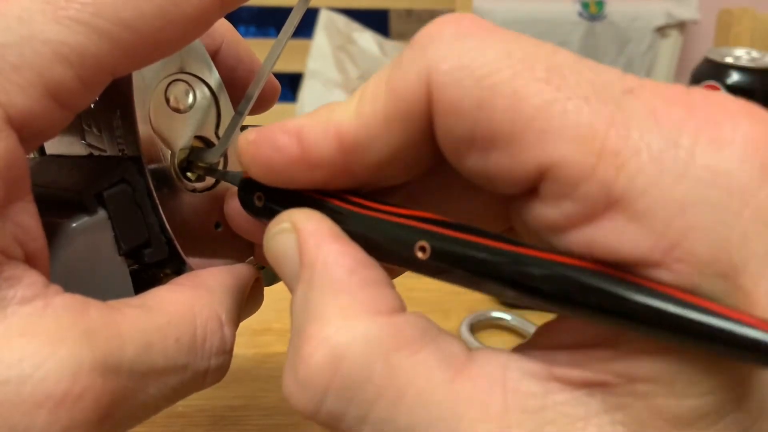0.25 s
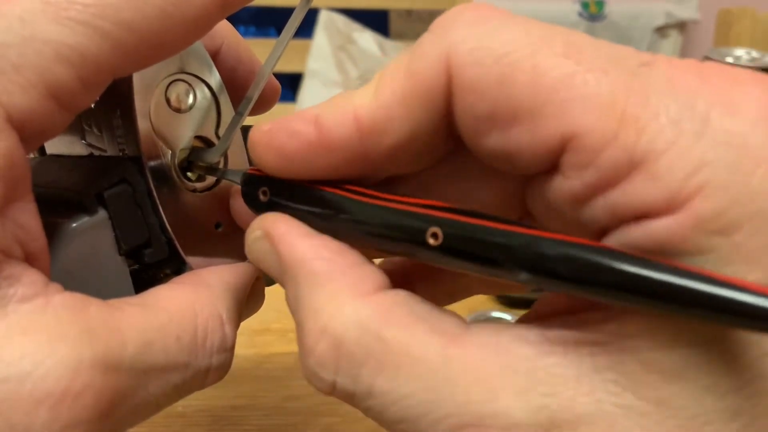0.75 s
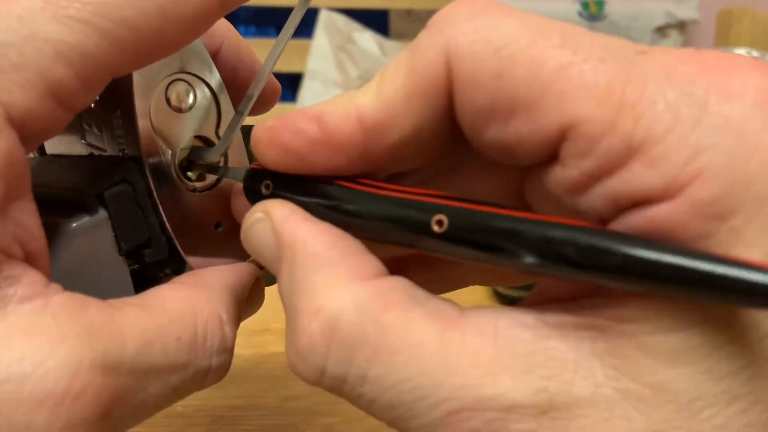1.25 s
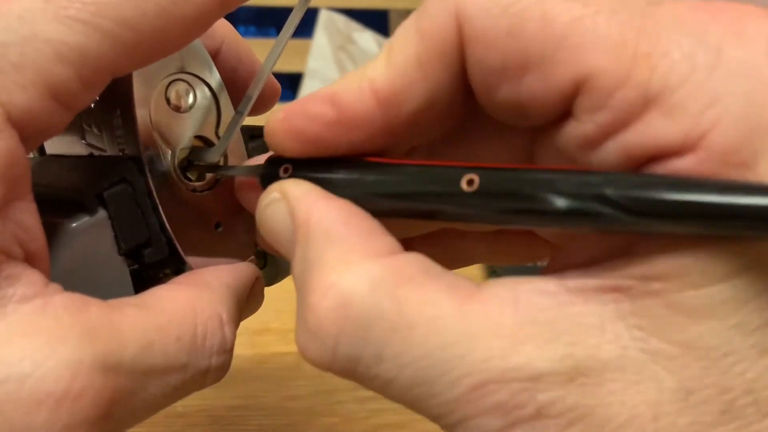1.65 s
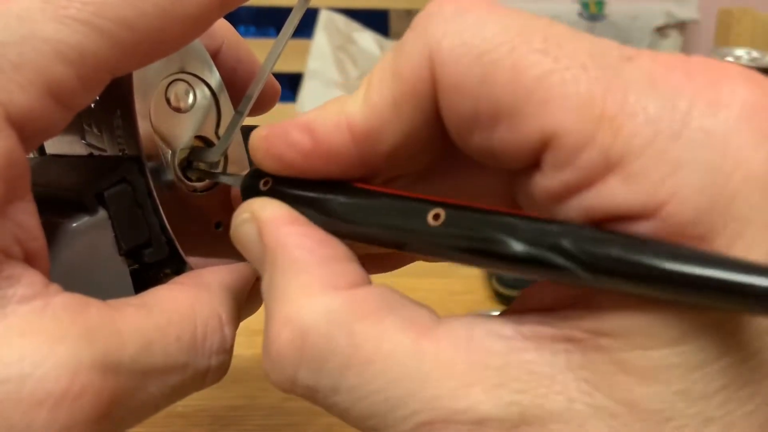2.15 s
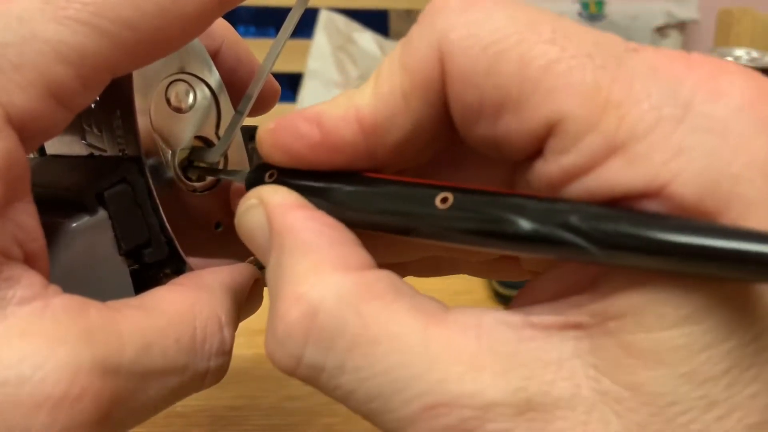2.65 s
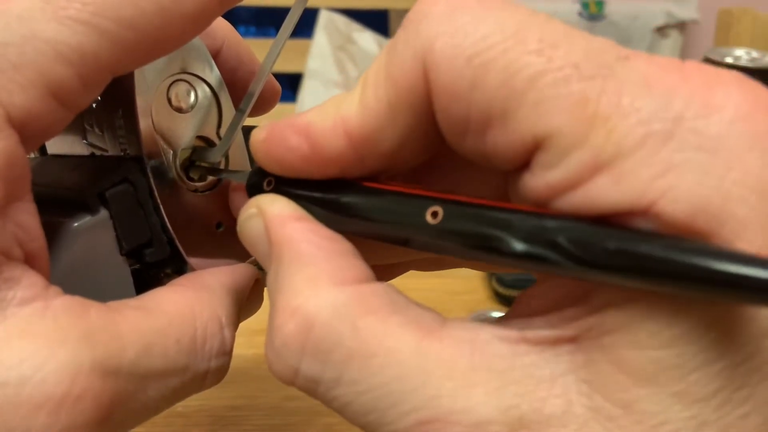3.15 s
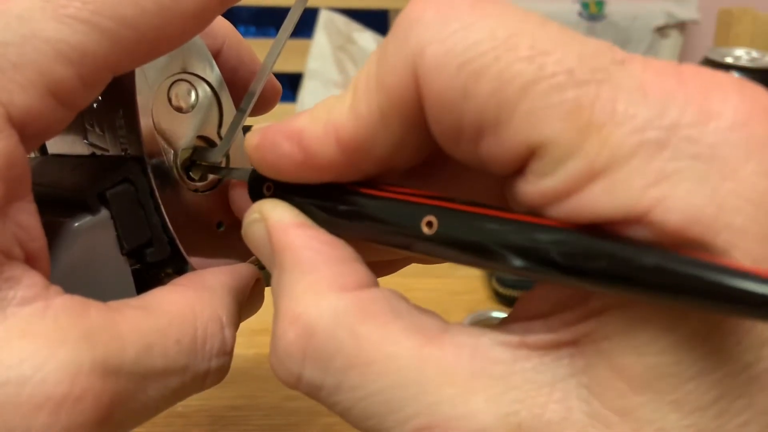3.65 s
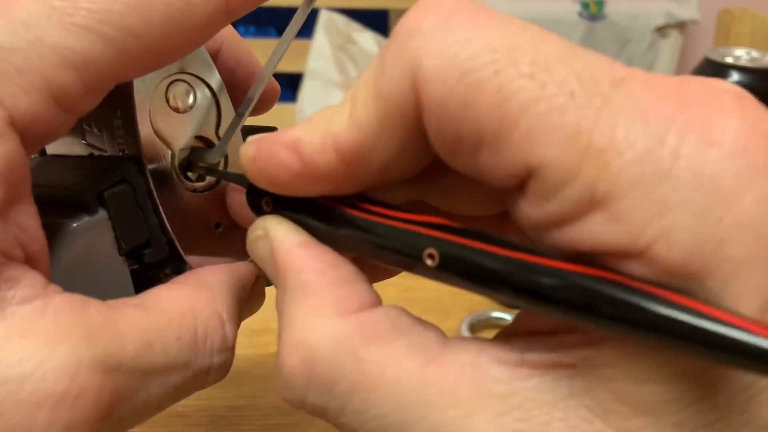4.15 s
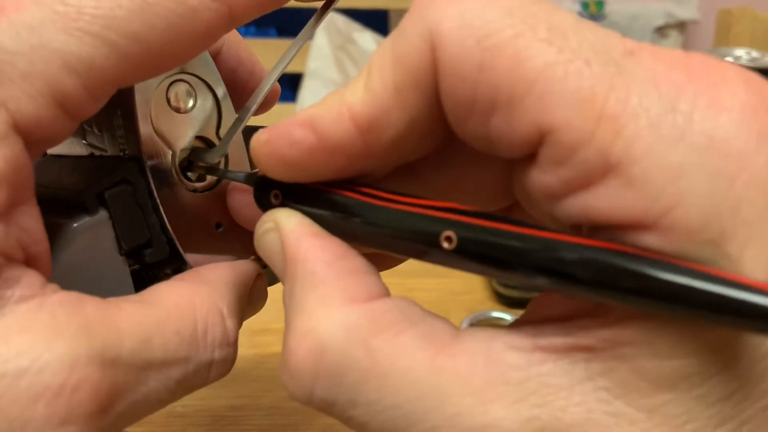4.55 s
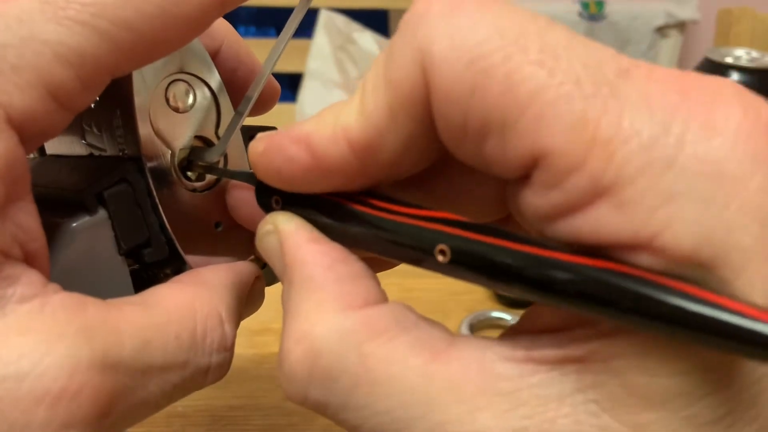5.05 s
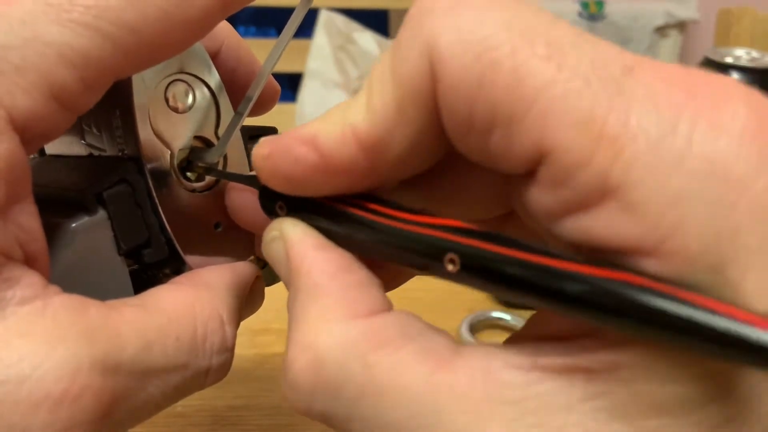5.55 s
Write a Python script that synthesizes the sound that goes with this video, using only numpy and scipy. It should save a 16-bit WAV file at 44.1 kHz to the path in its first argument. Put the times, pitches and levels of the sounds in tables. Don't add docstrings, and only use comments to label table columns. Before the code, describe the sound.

Close-up lock picking: sparse faint ticks, a brief scratchy cluster, a few hard steel snaps and a final chirp above quiet room rumble.

```python
import sys
import numpy as np
from scipy import signal
from scipy.fft import rfft, irfft, next_fast_len
from scipy.io import wavfile
from scipy.ndimage import uniform_filter1d

SR = 44100
rng = np.random.default_rng(int(sys.argv[2]) if len(sys.argv) > 2 else 0)


def field_ratio(decibels):
    return 10 ** (np.asarray(decibels, dtype=float) / 20)


def master_out(mix):
    frames = np.transpose(np.atleast_2d(mix))
    ceiling = np.clip(frames, -1, 1)
    pcm = np.round(ceiling * 32767).astype(np.int16)
    wavfile.write(sys.argv[1], SR, pcm)


N = 256220


def unit(x):
    return x / np.sqrt(np.mean(x ** 2) + 1e-20)


def along(points, hz):
    f, v = np.transpose(points)
    return np.interp(np.log(hz + 1), np.log(f + 1), v)


def filtered(x, response):
    m = next_fast_len(x.shape[-1] + 8192)
    spectrum = rfft(x, m) * response(np.fft.rfftfreq(m, 1 / SR))
    return irfft(spectrum, m)[..., :x.shape[-1]]


def smoothed(x, rows, columns):
    return uniform_filter1d(uniform_filter1d(x, size=rows, axis=0), size=columns, axis=1)


def ring(t, hz, db, t60, attack, phase=0):
    envelope = field_ratio(db - 60 * t / t60) * (1 - np.exp(-t / attack))
    return envelope * np.sin(2 * np.pi * (hz * t + phase))


def add(track, s, sound):
    track[round(s * SR):][:len(sound)] += sound


def struck(events, rise_s):
    out, t = np.zeros(N + SR), np.arange(SR // 5) / SR
    for s, hz, db, t60 in events:
        add(out, s, ring(t, hz, db, t60, rise_s(hz)))
    return out[:N]


# f/Hz, correlation
LIKENESS = [(40, .92), (170, .96), (340, .85), (450, .25), (1000, .3), (1600, .55), (3000, .35),
            (6000, .35), (7200, .99)]
# f/Hz, level/dB
BALANCE = [(30, -1), (60, 2.5), (150, -4), (300, 0), (650, 4.5), (1100, 0), (4000, 0), (5500, -2.5),
           (7500, 0.5)]


def diffuse(pair):
    turn = lambda hz: np.arccos(np.clip(along(LIKENESS, hz), 0, 1)) / 2
    mid, side = filtered(pair, lambda hz: np.array([np.cos(turn(hz)), np.sin(turn(hz))]))
    return filtered(np.array([mid + side, mid - side]), lambda hz: field_ratio(along(BALANCE, hz) * [[.5], [-.5]]))


# f/Hz, width/Hz, level/dB
DUCT_MODES = [(56.67, 19, 9), (99.57, 6.6, 11.5), (144.65, 12, 11), (184.6, 5.3, 9.5), (213.4, 12, 7.5),
              (240, 30, 5.5), (305, 12, 3), (342.8, 8, 6), (558, 15, 7.5), (614, 22, 7.5),
              (688.4, 11.97, 11.5), (733, 33, 7), (801, 13, 6.5), (2014, 72.5, 12), (2350, 60, 0.5),
              (3415, 18, 10.5)]


def rush(spectrum, patchy_db):
    z = signal.stft(rng.standard_normal((2, N)), nperseg=2048)[2]
    patches = unit(smoothed(rng.standard_normal(z.shape[1:]), 3, 4))
    pair = signal.istft(z * field_ratio(patchy_db * patches), nperseg=2048)[1][:, :N]
    duct_db = lambda hz: sum(db / (1 + (2 * (hz - c) / w) ** 2) for c, w, db in DUCT_MODES)
    return unit(filtered(diffuse(pair), lambda hz: field_ratio(along(spectrum, hz) + duct_db(hz))))


# f/Hz, level/dB
RUMBLE = [(18, -56.5), (30, -19.5), (91, -13), (183, 0), (272, -10.5), (347, -5), (437, -18.5),
          (480, -20.5), (620, -52.5), (1060, -120)]
# f/Hz, level/dB
VENT_AIR = [(350, -42), (480, -2.5), (700, -2), (900, -3.5), (1300, -14), (1700, -4.5), (2000, -18.5),
            (2350, -8), (2800, -15), (3400, -18), (3900, -28), (4400, -16.5), (4900, -47.5), (6500, -49.5)]
# f/Hz, level/dB
MIC_HISS = [(3000, -40), (5000, 4), (7000, -5.5), (12000, -6), (14500, -9.5), (16000, -27.5), (17500, -72)]
# t/s, level/dB
RUMBLE_DRIFT = [(0, -49.5), (1.9, -49.5), (2.3, -48), (3.15, -49.5), (3.5, -47.5), (3.68, -49), (4.9, -50),
                (5.2, -50.5), (5.81, -48.5)]


def hum():
    s, rumble_db = np.transpose(RUMBLE_DRIFT)
    drift = field_ratio(np.interp(np.arange(N) / SR, s, rumble_db) + 2.0)
    rumble = drift * rush(RUMBLE, patchy_db=1.5)
    air = field_ratio(-60) * rush(VENT_AIR, patchy_db=1.2)
    hiss = field_ratio(-85.0) * rush(MIC_HISS, patchy_db=3.0)
    return rumble + air + hiss


# f/Hz, t60/s
REVERB_TIME = [(300, .5), (2000, .5), (5500, .45), (9000, .45), (12000, .37), (16000, .34)]


def room(x):
    out, stretch = np.zeros((2, N + SR)), SR // 2
    for start in range(0, N, stretch):
        hz, t, z = signal.stft(diffuse(rng.standard_normal((2, stretch))), SR, nperseg=256)
        decay = field_ratio(-60 * t / along(REVERB_TIME, hz)[:, None])
        build_up = 1 - 0.35 * np.exp(-t / 0.025)
        tail = signal.istft(z * decay * build_up, SR, nperseg=256)[1]
        wet = signal.fftconvolve(x[None, start:start + stretch], tail / np.linalg.norm(tail[0]), axes=1)
        add(out.T, start / SR + .003, wet.T)
    return out[:, :N]


def gated(x):
    gate_db = -84
    z = signal.stft(x, nperseg=256)[2]
    power = np.abs(smoothed(np.mean(np.abs(z) ** 2, axis=0), 5, 5))
    gain = np.sqrt(power / (power + field_ratio(2 * gate_db)))
    return signal.istft(z * gain, nperseg=256)[1][:, :N]


# f/Hz, level/dB
WALL_RETURN = [(200, 1), (1500, 16.5), (4000, 8.5), (6000, 7), (7500, 1), (8400, 4), (9200, 2.5),
               (11000, -3), (13500, 2), (14500, 0), (15900, -6), (16600, -24)]


def echo(x):
    return gated(field_ratio(-21.0) * room(filtered(x, lambda hz: field_ratio(along(WALL_RETURN, hz)))))


# t/s, f/Hz, level/dB, t60/s
STAND_MODES = [
    (3.7125, 420, -34, .03),
    (3.7115, 1300, -43, 0.025),
    (3.712, 900, -41, .025),
    (3.7135, 640, -36, .035),
    (3.712, 230, -35, .04),
]


def stand():
    return struck(STAND_MODES, lambda hz: 0.49 / hz)


# t/s, f/Hz, level/dB, t60/s
TABLE_MODES = [
    (4.1, 210, -33, .04),
    (3.723, 110, -33, 0.053),
    (3.7115, 1630, -34.5, 0.023),
    (1.793, 1400, -48, .008),
    (3.552, 1900, -53, .008),
    (3.711, 2800, -37.5, .012),
    (3.711, 3980, -30.5, 0.0083),
    (3.711, 4700, -33, 0.0092),
    (3.552, 2700, -46.5, .01),
    (3.552, 4500, -44.5, 0.011),
]


def table():
    return struck(TABLE_MODES, lambda hz: 0.21 / hz)


# t/s, centre f/Hz, level/dB, t60/s
VICE_KNOCKS = [
    (1.7927, 900, -53, 0.031),
    (3.5538, 1500, -53, 0.017),
    (3.71, 697, -35.5, 0.02),
    (3.712, 602, -32, 0.02203),
    (4.531, 1497, -45.5, 0.026),
]


def vice():
    out, t = np.zeros(N + SR), np.arange(SR // 5) / SR
    for s, hz, db, t60 in VICE_KNOCKS:
        band = signal.butter(2, [hz / 3, hz * 2], "band", fs=SR)
        dull = signal.lfilter(*band, rng.standard_normal(len(t)))
        add(out, s, field_ratio(db - 60 * t / t60) * unit(dull))
    return out[:N]


# t/s, f/Hz, level/dB, t60/s
WRENCH_CHIRPS = [
    (5.7953, 3170, -46, 0.015),
    (5.7994, 3110, -15, 0.011),
    (5.7994, 3300, -26, 0.009),
    (5.7996, 4300, -48, .005),
    (5.8058, 3100, -24, .011),
    (5.8058, 4200, -46, .006),
]


def wrench():
    return struck(WRENCH_CHIRPS, lambda hz: 0.00074)


def rub(strokes, parts):
    t = np.arange(N) / SR
    stroke = sum(field_ratio(db) * np.sin(np.pi * np.clip((t - s) / length, 0, 1)) for s, length, db in strokes)
    grit = rng.standard_normal(N) * rng.exponential(size=N) ** 1.2
    loss = lambda f: 1j * f * 900
    steel = lambda f: sum(field_ratio(db) * loss(f) / (hz * hz - f * f + loss(f)) for hz, db, t60 in parts)
    return stroke * unit(filtered(grit, steel))


# t/s, length/s, level/dB
PICK_STROKES = [
    (0.545, 0.037, -75),
    (1.362, 0.0087, -76),
    (1.445, .03, -83),
    (1.538, 0.033, -61),
    (1.569, 0.077, -67),
    (4.02, .025, -80),
    (5.422, .045, -75.5),
    (5.748, 0.03, -70),
    (5.772, 0.017, -69),
    (5.796, .014, -68),
]


def scrapes():
    return rub(PICK_STROKES, SHANK + PIN + SPRING + TIP[:1] + BODY)


# t/s, length/s, level/dB
DULL_SWELLS = [
    (3.538, 0.013, -74),
    (3.692, .03, -59.5),
    (4.51, .03, -72),
]
# f/Hz, level/dB, t60/s
PLUNGER_MODES = [(5000, -3, .005)]


def dull_swells():
    top_hz = 8300
    return filtered(rub(DULL_SWELLS, BODY + CASE + PLUNGER_MODES), lambda hz: 1 / (1 + (hz / top_hz) ** 20))


# t/s, f/Hz, level/dB, t60/s
PLUG_MODES = [(1.537, 6200, -52.5, 0.0066), (1.552, 6300, -49, .008), (1.567, 5760, -35.5, 0.0055),
              (1.6147, 6630, -46, 0.0099), (1.6495, 5900, -53, .005), (1.657, 5790, -38, .006),
              (1.657, 3153, -45, 0.008), (1.793, 2300, -44.5, .006), (3.7103, 5700, -31, .005),
              (3.7114, 5040, -26, 0.0055), (1.567, 13800, -32, .005), (3.552, 5600, -43, .006),
              (3.7125, 14000, -15.5, 0.0051), (4.5255, 5800, -44, .005), (4.5313, 6740, -30, .005),
              (4.5319, 3080, -40, .006), (4.5313, 4900, -32, .005), (1.537, 4600, -46, .005),
              (1.6145, 4000, -48, .006), (1.601, 8400, -39, .005), (5.7532, 14700, -50, .005),
              (5.7765, 14700, -46, .006), (5.776, 5600, -51, .005), (4.541, 15600, -42, .012),
              (5.7595, 7600, -57, .006), (5.776, 4400, -48, 0.0046), (5.8018, 12600, -54, .006)]


def plug():
    return struck(PLUG_MODES, lambda hz: 0.00039)


# t/s, level/dB, place
PROBES = [(0.3488, -56, 0.86), (.5514, -74, .4), (.7924, -75, .3), (.837, -66, .9), (1.3014, -83, .3),
          (1.3674, -65, 0), (2.006, -54, -.3), (2.053, -58.5, .6), (2.3727, -61, 0.35), (2.4303, -66.5, 0),
          (1.7857, -55, 0.76), (3.1703, -53, 0.1), (3.5628, -46.5, -0.092), (4.027, -59.5, 0.55),
          (5.458, -62, 0.44)]
# t/s, pin level/dB, shank level/dB, tip level/dB, body level/dB
PIN_SNAPS = [(4.5252, -34, -44, -55, -40), (1.5363, -37, -42, -58, -49), (1.567, -37.5, -32.5, -34, -37.5),
             (1.601, -53.5, -44, -43, -55), (1.6018, -56, -42, -46.5, -58), (1.6128, -46, -50, -59.5, -46),
             (1.6148, -45, -39, -64, -50), (1.65, -48, -44, -61, -45.5), (1.6551, -42, -30, -50, -40),
             (1.6561, -40, -23.5, -44, -38), (1.6569, -32, -36, -39, -42), (3.5516, -23.5, -34, -44.5, -46),
             (3.5516, -49.5, -37.5, -33, -38), (5.7527, -54, -50, -66, -65), (5.776, -54, -46, -62, -66),
             (5.8, -54, -58, -58, -66), (5.8066, -55, -40, -60, -56)]
# t/s, level/dB, place, body level/dB
HARD_SNAPS = [
    (1.7925, -13, .6, -23),
    (1.7934, -22, .7, -14),
    (4.5313, -13, 1.9, -26),
]
# t/s, level/dB, place, body level/dB
PIN_DROP = [
    (3.7100, -6, .15, -16),
    (3.7108, -10, .1, -19),
    (3.7116, -5, .6, -24),
    (3.7134, -10, 1.55, -23),
    (3.7136, -15, -.2, -30),
]


def placed(s, db, place, body_db, room_db=0):
    pin, shank, tip = db - 10.5 * np.abs(place - np.arange(3))
    return s, [pin, pin, shank, tip, db + body_db, db + body_db], room_db


def contacts():
    spring_db, case_db = -1, -6
    click_body_db = -10.5
    hard_room_db = -14
    clicks = [placed(*row, click_body_db) for row in PROBES]
    snaps = [(s, [pin, pin + spring_db, shank, tip, body + case_db, body], 0)
             for s, pin, shank, tip, body in PIN_SNAPS]
    hard = [placed(*row, hard_room_db) for row in HARD_SNAPS]
    drop = [placed(*row, hard_room_db) for row in PIN_DROP]
    return clicks + snaps + hard + drop


# f/Hz, level/dB, t60/s
PIN = [(11000, -4, .005), (11800, -5, .004)]
SPRING = [(12900, 0, .006), (13500, -4, .005), (14200, -9, .004)]
SHANK = [(8400, -5, .005), (9500, 0, .006), (10000, -6, .004)]
TIP = [(14800, 0, .004), (15450, 6, .005)]
CASE = [(2200, -22, .005), (3000, -9, .007), (4100, -4, .006)]
BODY = [(5700, -15, .005), (6900, 0, .006), (7600, -5, .005)]


def pins():
    rise_cycles, scatter_db, blur = 1.8, 2.5, .5
    near, around, t = np.zeros(N + SR), np.zeros(N + SR), np.arange(SR // 20) / SR
    for s, parts, room_db in contacts():
        for modes, part_db in zip((PIN, SPRING, SHANK, TIP, CASE, BODY), parts):
            for hz, mode_db, t60 in modes:
                size, shift, phase = rng.standard_normal(3)
                db = part_db + mode_db
                heard_hz = hz * (1 + 0.0079 * shift)
                add(near, s, ring(t, heard_hz, db + scatter_db * size, t60, rise_cycles / hz, phase))
                add(around, s, ring(t, hz, db + room_db + 4.0, blur * t60, .0001, phase))
        bright = np.diff(rng.standard_normal(len(t) + 1))
        crack = field_ratio(max(parts) - 25.0 - 60 * t / 0.0043) * bright
        add(near, s, crack)
        add(around, s, crack)
    return near[:N], around[:N]


# t/s, f/Hz, level/dB, t60/s
LOUD_MODES = [(1.7924, 8350, -11, .006), (1.7926, 7000, -21, .005), (1.7926, 13400, -19, .004),
              (1.7926, 15000, -21, .005), (3.5514, 16300, -23, .004), (3.7114, 9200, 0, .0055),
              (3.7112, 8400, -12, .005), (3.7102, 6800, -22, .007), (3.7134, 15300, -7, .0035),
              (4.5311, 9300, -12, .005), (4.5312, 13200, -29, .005), (4.5312, 15800, -8.5, .004),
              (4.5311, 11000, -21, .004)]
# t/s, then level/dB of plunger, body, shank, pin, tip
BLOWS_AWAY = [
    (1.793, -27, -16, -7, -7, -10),
    (3.552, -28, -22, -22, -30, -30),
    (3.711, -13, -13, 1, 2, -3),
    (4.531, -24, -20, -12, -13, -7),
]


def loud_parts():
    away_hz, away_t60 = [4700, 6900, 9400, 11800, 15000], .002
    around, t = np.zeros(N + SR), np.arange(SR // 20) / SR
    for s, *levels in BLOWS_AWAY:
        for k, (hz, db) in enumerate(zip(away_hz, levels)):
            add(around, s, (-1) ** k * ring(t, hz, db, away_t60, .0001))
    return struck(LOUD_MODES, lambda hz: 0.00039), around[:N]


def ports(air, turns):
    f, cycles = np.transpose(turns)
    return filtered(air, lambda hz: np.exp(1j * np.pi * np.interp(hz, f, cycles) * [[-1], [1]]))


# f/Hz, turn/cycles
ROOM_TURNS = [(0, 0), (150, .05), (380, 0), (550, -.4), (1150, -.45), (1900, -.73), (2300, -.9),
              (2500, -1.35), (3100, -1.17), (4300, -1.02), (5000, -1.24), (17000, 1.22)]
# f/Hz, turn/cycles
LOCK_TURNS = [(0, 0), (150, .05), (380, 0), (550, -.4), (1150, -.45), (2350, -.7), (3900, -1), (4750, -1.2),
              (5700, -1.25), (6750, -.87), (17000, 1.22)]


def scene():
    near, around = np.add(pins(), loud_parts())
    rest = scrapes() + dull_swells() + vice() + table() + wrench() + plug()
    background = echo(around + rest) + hum()
    return stand() + ports(near + rest, LOCK_TURNS) + ports(background, ROOM_TURNS)


def top_cut(x):
    return signal.sosfilt(signal.butter(12, 17310, fs=SR, output="sos"), x)


# f/Hz, level/dB
CAPSULE_RESPONSE = [(25, -18), (48, -1), (15000, 2), (16200, -8), (16900, -17), (17500, -53.5)]


def record(dry):
    mix = filtered(dry, lambda hz: field_ratio(along(CAPSULE_RESPONSE, hz)))
    return top_cut(mix)


dry = scene()
out = record(dry)
master_out(out)
```